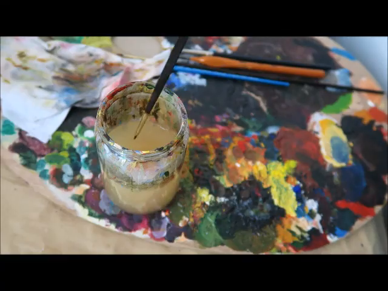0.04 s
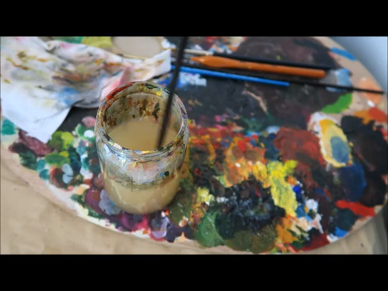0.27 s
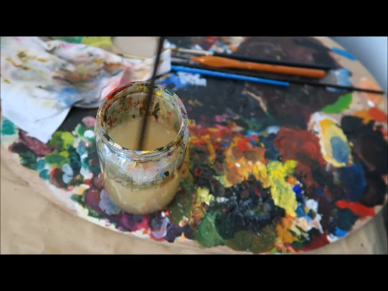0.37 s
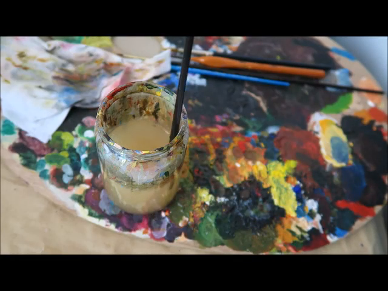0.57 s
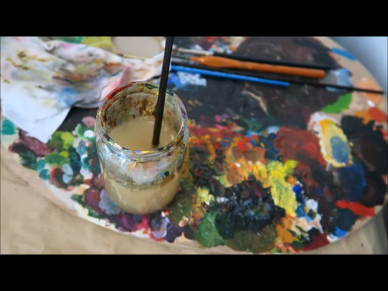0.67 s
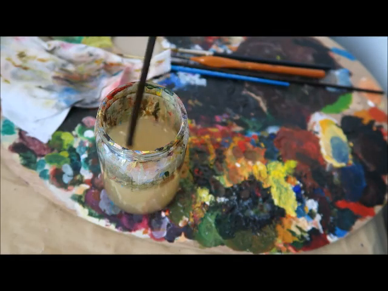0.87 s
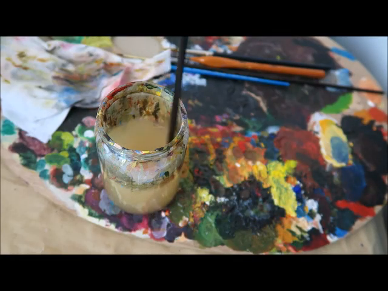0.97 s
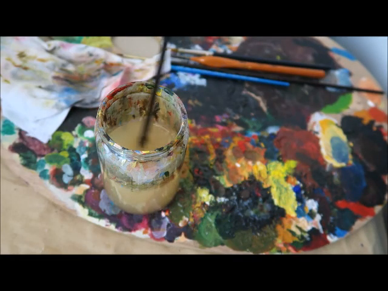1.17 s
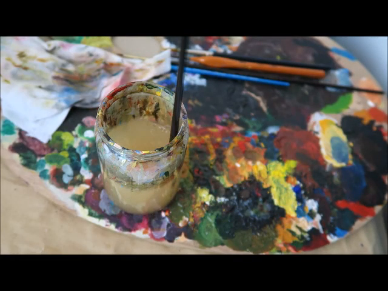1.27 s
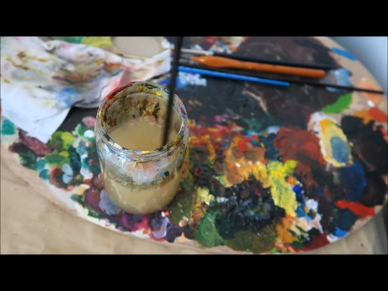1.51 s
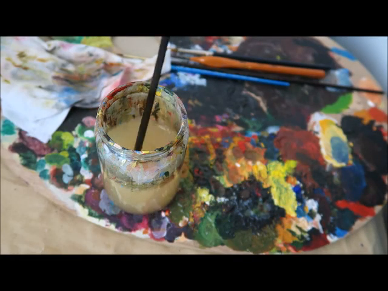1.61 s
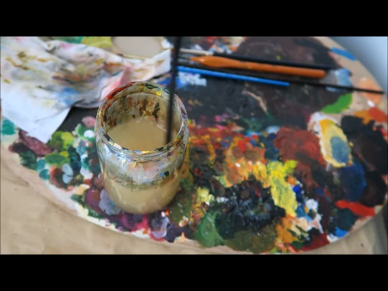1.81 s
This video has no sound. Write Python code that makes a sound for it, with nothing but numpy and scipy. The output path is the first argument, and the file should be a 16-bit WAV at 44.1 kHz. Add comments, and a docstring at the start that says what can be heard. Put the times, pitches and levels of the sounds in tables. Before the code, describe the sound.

A paintbrush clinks quickly against a glass jar while swishing in water, with small splashes.

```python
"""Paintbrush in a water jar

A brush is swished to and fro in a glass jar of water, close to the microphone, in a small room.
Its handle clicks against the glass and rings it; the bristles drag in bubbles and throw up small
splashes. One firm push rocks the jar on the palette beneath it. A low hum lies under it all."""
import sys
import numpy as np
from scipy import signal
from scipy.fft import rfft, irfft, next_fast_len
from scipy.io import wavfile
from scipy.ndimage import map_coordinates

SR = 44100
rng = np.random.default_rng(int(sys.argv[2]) if len(sys.argv) > 2 else 0)


def to_wav(sig):
    """Store sig (one row per channel, or 1-D mono) as 16-bit WAV at the path in sys.argv[1].

    Samples outside -1..1 are clipped; the rate is SR.
    """
    pcm = np.clip(np.atleast_2d(sig), -1, 1) * 32767
    pcm = np.round(pcm).astype(np.int16)
    wavfile.write(sys.argv[1], SR, pcm.T)  # frames by channels


N = 81585

# The low hum. Each row: frequency in Hz, rms level in dB.
HUM_TONES = [(48.4, -54), (75.2, -48), (123.8, -60.5), (204.6, -60)]
# Room tone. Each row: frequency in Hz, relative noise density in dB.
AIR_COLOUR = [(25, -16), (80, -8), (212, -10), (335, -14), (500, -21.5), (3500, -36), (16000, -51.5)]
# Room tone across the stereo pair. Each row: frequency in Hz, left-right correlation.
AIR_CORRELATION = [(60, 0.95), (130, 0.82), (250, 0.033), (4000, 0.079)]
# The room's decay. Each row: frequency in Hz, time to fall 60 dB (t60) in seconds.
REVERB_T60 = [(1300, 0.32), (9000, 0.39), (16000, 0.13)]
# The reverb's colour. Each row: frequency in Hz, relative level in dB.
REVERB_COLOUR = [(1200, 5), (3000, 5.5), (8000, -4.5), (16000, 0.5)]
# The reverb's width. Each row: frequency in Hz, added side gain in dB.
REVERB_WIDTH = [(1000, -10.5), (3000, -12.5), (8000, 6)]
# The palette under the jar. Each row: frequency in Hz, level in dB, t60 in seconds.
PALETTE_MODES = [(82.5, -19, 0.083), (221, -26, 0.13), (345, -26, 0.049)]
# Splashes behind the bristles. Each row: crest time and width in seconds, level in dB, pitch in Hz.
SPLASH_CRESTS = [(0.311, 0.0016, -46, 2110), (0.381, 0.0065, -49.5, 3010), (0.579, 0.016, -41, 2770),
                 (0.943, 0.031, -50, 2090), (1.019, 0.0055, -43, 2330), (1.188, 0.0058, -40, 3220),
                 (1.272, 0.01, -48, 3600), (1.35, 0.033, -42.5, 2350), (1.5256, 0.0032, -36, 2630),
                 (1.746, 0.0066, -39.5, 3080)]
# Bubbles. Each row: start in seconds, starting pitch in Hz, peak in dB, swell and t60 in seconds.
BRUSH_BUBBLES = [(0.4146, 1100, -26, 0.00019, 0.0068), (0.5660, 1790, -25.5, 0.00062, 0.0081),
                 (0.564, 4170, -28.5, 0.0018, 0.048), (0.566, 3770, -29, 0.0015, 0.064),
                 (0.5748, 1804, -27, 0.00075, 0.016), (0.5909, 4350, -8.5, 0.00081, 0.014),
                 (0.598, 4110, -17, 0.0014, 0.014), (0.617, 1053, -29, 0.0024, 0.0086),
                 (0.617, 4100, -28, 0.0012, 0.015), (1.018, 1660, -35, 0.00057, 0.0071),
                 (1.0292, 3015, -27.5, 0.00076, 0.063), (1.027, 1810, -22, 0.00078, 0.023),
                 (1.026, 1298, -22, 0.0017, 0.0084), (1.181, 4150, -34, 0.0007, 0.047),
                 (1.2020, 2703, -19, 0.0021, 0.014), (1.2884, 1190, -28, 0.0016, 0.01),
                 (1.3064, 1050, -20.5, 0.0089, 0.025), (1.321, 1420, -32.5, 0.002, 0.025),
                 (1.306, 2540, -34.5, 0.0016, 0.021), (1.343, 1410, -28.5, 0.0015, 0.032),
                 (1.345, 2820, -30.5, 0.0019, 0.017), (1.35, 3190, -35, 0.0018, 0.022),
                 (1.37, 1055, -28, .002, 0.027), (1.3744, 1201, -13, 0.0041, 0.011),
                 (1.5051, 1533, -37.5, 0.0015, 0.02), (1.5237, 2146, -35, 0.00049, 0.038),
                 (1.554, 1766, -27.5, 0.001, 0.028), (1.7390, 2970, -24, 0.00027, 0.0079),
                 (1.746, 2144, -32.5, 0.0003, 0.042), (1.746, 1170, -36.5, 0.00082, 0.016)]
# The jar's modes, lowest first. Each row: frequency in Hz, relative level in dB, t60 in seconds.
GLASS_MODES = [(2706, -0.5, 0.31), (3864, -13, 0.19), (4740, -2, 0.17), (4833, -1, 0.4), (5800, -8.5, 0.22),
               (6035, 1, 0.15), (7670, -1, 0.3), (9200, 0.5, 0.19), (11400, 6, 0.17)]
# Brief dips in the ring. Each row: centre in seconds, gain in dB, width in seconds.
GLASS_DIPS = [(0.416, -15, 0.0083), (0.8692, -42, 0.003), (0.907, -0.5, 0.0034)]
# The handle's click and its chatter. Each row: frequency in Hz, relative level in dB.
CLICK_COLOUR = [(200, -22.5), (700, -13), (1500, -7), (3000, -7.5), (6000, 8), (10000, 4.5), (14000, 6),
                (17000, -11.5)]
CHATTER_COLOUR = [(200, -20), (700, -2), (1500, -3), (3000, 11), (6000, 7), (10000, 7), (14000, 5),
                  (17000, -74.5)]
# Handle on glass. Each row: start in seconds, click and chatter levels in dB, chatter tilt in dB per
# octave, then ring gains in dB for the lowest two modes, the 4.8 kHz pair, the 6 kHz pair and the rest.
HANDLE_STRIKES = [(0.234, -11.5, -44.5, -33, -50, -41, -44, -51.5),
                  (0.4153, -2, -28, -1.5, -42, -39, -25, -39), (0.5082, -3.5, -29, 9, -45, -40.5, -37, -52),
                  (0.5912, -6, -19.5, 3.5, -40.5, -37, -35.5, -40),
                  (0.6661, -3, -23.5, 4, -49, -41.5, -45, -47),
                  (0.8568, -15.5, -20, -3, -17.5, -41.5, -32.5, -43),
                  (1.0267, -2, -19.5, -2.5, -28, -41.5, -36, -47),
                  (1.2011, -4.5, -23.5, -1.5, -35.5, -40.5, -35, -48),
                  (1.3076, -21, -38.5, 4, -50, -59, -53, -55), (1.3737, -4.5, -27, 5, -54, -43, -41, -46),
                  (1.553, -7, -33, 0.5, -43.5, -53.5, -50, -67)]

AIR_DB, HUM_WAVER_DB = -49.5, 1.5
KNOCK_SEND_DB, RING_SEND_DB, WATER_SEND_DB, REVERB_RISE_S = -8, -13, -10.5, 0.003
THUD_START_S, THUD_RISE_S = 0.858, 0.016
DROPLETS_PER_S, DROPLET_LOG_SPREAD, DROPLET_T60_CYCLES = 1100, 0.804, 30
STIR_START_S, STIR_HZ, STIR_DB = 0.31, 2333, -63
BUBBLE_RISE_PER_S = 5.5  # climb relative to the starting pitch
SHIMMER_HZ, SHIMMER_DB, SHIMMER_SPREAD_DB, SHIMMER_T60_S = (3200, 13500), -10, 4, 0.17  # weak high modes
RING_ATTACK_S, MODE_SPREAD_DB, FLUTTER_DB, FLUTTER_HZ = 0.00089, 1.5, 3.5, 19
SLOSH_DEPTH, SLOSH_HZ = 0.0045, 7.23  # moving water bends the pitch of the glass
CHATTER_T60_S, CHATTER_SIDE_DB, TILT_FROM_HZ = 0.031, -9.5, 2300
NEAR_ECHO_S, NEAR_ECHO_DB = 0.0025, -12.5  # each click comes back from a surface close by


def amp(db):
    """Decibels to gain."""
    return 10 ** (np.asarray(db) / 20)


def unit(x):
    """Scale to rms 1."""
    return x / np.sqrt(np.mean(x ** 2) + 1e-20)


def along(points, hz):
    """Read a curve of (Hz, value) points on a log frequency axis."""
    freqs, values = np.transpose(points)
    return np.interp(np.log(hz + 1), np.log(freqs + 1), values)


def fade(t, t60):
    """A decay of 60 dB in t60."""
    return amp(-60 * t / t60)


def wobble(rate):
    """A smooth random curve, rate knots a second."""
    return map_coordinates(rng.standard_normal(256), [np.arange(N) * rate / SR], mode="wrap")


def filtered(x, response):
    """Filter x by a gain given as a function of Hz."""
    n = x.shape[-1]
    size = next_fast_len(2 * n)
    return irfft(rfft(x, size) * response(np.fft.rfftfreq(size, 1 / SR)), size)[..., :n]


def add(track, start_s, sound):
    """Mix a sound into the track."""
    i = int(np.clip(round(start_s * SR), 0, N))
    track[..., i:i + sound.shape[-1]] += sound[..., :N - i]


def background():
    """A wavering hum over quiet room tone, centred in the bass and wide above it."""
    t = np.arange(N) / SR
    hum = np.zeros(N)
    for hz, db in HUM_TONES:
        peak = np.sqrt(2) * amp(db + HUM_WAVER_DB * wobble(6.36))
        hum += peak * np.sin(2 * np.pi * hz * t + 1.11 * wobble(5.72))
    angle = lambda f: np.arccos(np.clip(along(AIR_CORRELATION, f), -1, 1)) / 2
    mid_side_gains = lambda f: amp(along(AIR_COLOUR, f)) * [np.cos(angle(f)), np.sin(angle(f))]
    mid, side = filtered(rng.standard_normal((2, N)), mid_side_gains)
    return hum + amp(AIR_DB) * unit(np.array([mid + side, mid - side]))


def room(x, side_db):
    """The small room's reflections, in stereo; the highest treble dies first."""
    hz, t, noise = signal.stft(rng.standard_normal((2, SR // 2)), SR, nperseg=256)
    decay = fade(t, along(REVERB_T60, hz)[:, None])
    _, tail = signal.istft(noise * decay * amp(along(REVERB_COLOUR, hz))[:, None], SR)
    tail *= 1 - np.exp(-(np.arange(tail.shape[1]) / SR / REVERB_RISE_S) ** 2)
    mid, side = signal.fftconvolve(x[None], tail / np.linalg.norm(tail[0]), axes=1)[:, :N]
    side = filtered(side, lambda f: amp(side_db + along(REVERB_WIDTH, f)))
    return np.array([mid + side, mid - side])


def thud():
    """One firm push rocks the jar and sounds the palette's low modes."""
    out, t = np.zeros(N), np.arange(SR // 2) / SR
    modes = sum(amp(db) * fade(t, t60) * np.sin(2 * np.pi * hz * t) for hz, db, t60 in PALETTE_MODES)
    add(out, THUD_START_S, modes * (1 - np.exp(-(t / THUD_RISE_S) ** 2)))
    return out


def droplets(centre_hz):
    """An even patter of tiny bubbles around one pitch, rms 1."""
    when, pitch, strength = rng.random((int(DROPLETS_PER_S * N / SR), 3)).T[:, :, None]
    age = np.arange(SR // 80)  # samples
    cycles = centre_hz * np.exp(DROPLET_LOG_SPREAD * (2 * pitch - 1)) * age / SR
    grains = amp(10 * strength) * np.sin(2 * np.pi * cycles) * fade(cycles, DROPLET_T60_CYCLES)
    positions = (when * N).astype(int) + age
    return unit(np.bincount(positions.ravel(), grains.ravel(), N)[:N])


def splashes():
    """Droplets, faint while the brush stirs and stronger in each splash."""
    t = np.arange(N) / SR
    crests = sum(amp(db) * np.exp(-0.5 * ((t - crest) / width) ** 2) * droplets(hz)
                 for crest, width, db, hz in SPLASH_CRESTS)
    return crests + amp(STIR_DB) * (t > STIR_START_S) * droplets(STIR_HZ)


def bubbles():
    """Each bubble dragged in by the bristles swells, rings and climbs in pitch."""
    out, t = np.zeros(N), np.arange(SR // 8) / SR
    for start, hz, db, swell, t60 in BRUSH_BUBBLES:
        envelope = (1 - np.exp(-(t / swell) ** 2)) * fade(t, t60)
        chirp = np.sin(2 * np.pi * hz * (t + BUBBLE_RISE_PER_S * t * t / 2))
        add(out, start, amp(db) * envelope / envelope.max() * chirp)
    return out


def glass_ring(t, ring_db):
    """The jar rings after a blow; the spot struck decides which modes speak."""
    shimmer = [(hz, SHIMMER_DB + SHIMMER_SPREAD_DB * rng.standard_normal(), SHIMMER_T60_S)
               for hz in rng.uniform(*SHIMMER_HZ, size=30)]
    hz, mode_db, t60 = np.transpose(GLASS_MODES + shimmer)[:, :, None]
    struck_db = np.take(ring_db, np.arange(len(hz)) // 2, mode="clip")[:, None]
    gains = amp(struck_db + mode_db + MODE_SPREAD_DB * rng.standard_normal(hz.shape))
    bend = 1 + SLOSH_DEPTH * np.sin(2 * np.pi * (SLOSH_HZ * t + rng.random(hz.shape)))
    beat_hz = FLUTTER_HZ * rng.uniform(0.5, 2.02, hz.shape)  # each mode beats at its own rate
    flutter = amp(FLUTTER_DB * np.sin(2 * np.pi * (beat_hz * t + rng.random(hz.shape))))
    cycles = np.cumsum(hz * bend, axis=1) / SR + rng.random(hz.shape)
    modes = gains * flutter * fade(t, t60) * np.sin(2 * np.pi * cycles)
    return modes.sum(0) * (1 - np.exp(-t / RING_ATTACK_S))


def handle_chatter(t, tilt_db):
    """The handle chatters on the glass: a short burst of noise, as mid and side."""
    octaves = lambda f: np.log2(np.maximum(f, TILT_FROM_HZ) / TILT_FROM_HZ)
    colour = lambda f: amp(along(CHATTER_COLOUR, f) + tilt_db * octaves(f))
    return unit(filtered(rng.standard_normal((2, len(t))), colour)) * fade(t, CHATTER_T60_S)


def handle_click(size=1024):
    """The hard contact of handle and glass: a sharp pulse of peak 1."""
    cepstrum = irfft(np.log(amp(along(CLICK_COLOUR, np.fft.rfftfreq(size, 1 / SR)))))
    cepstrum[1:size // 2] *= 2  # fold to minimum phase, so nothing sounds ahead of the blow
    cepstrum[size // 2 + 1:] = 0
    pulse = irfft(np.exp(rfft(cepstrum)))
    return pulse / np.abs(pulse).max()


def clinks():
    """Each blow of the handle clicks, chatters and rings the glass."""
    clicks, chatters, rings = np.zeros(N), np.zeros((2, N)), np.zeros(N)
    click, t = handle_click(), np.arange(SR // 2) / SR
    for start, click_db, chatter_db, tilt_db, *ring_db in HANDLE_STRIKES:
        add(clicks, start, amp(click_db) * click)
        add(clicks, start + NEAR_ECHO_S, amp(click_db + NEAR_ECHO_DB) * click)
        add(chatters, start, amp(chatter_db) * handle_chatter(t, tilt_db))
        add(rings, start, glass_ring(t, ring_db))
    dips_db = sum(db * np.exp(-0.5 * ((np.arange(N) / SR - centre) / width) ** 2)
                  for centre, db, width in GLASS_DIPS)
    return clicks, chatters, rings * amp(dips_db)


def scene():
    """The jar stands close, straight ahead of the microphone; the room spreads around it."""
    clicks, (chatter_mid, chatter_side), rings = clinks()
    knocks = clicks + chatter_mid
    width = amp(CHATTER_SIDE_DB) * np.array([chatter_side, -chatter_side])
    water = bubbles() + splashes()
    reverb = room(amp(KNOCK_SEND_DB) * knocks + amp(RING_SEND_DB) * rings, side_db=-4.5)
    reverb += room(amp(WATER_SEND_DB) * water, side_db=-3.5)
    return background() + reverb + thud() + water + rings + knocks + width


def record(dry, top_hz=16900):
    """The microphone's signal is cut steeply above the band limit."""
    return filtered(dry, lambda hz: 1 / (1 + (hz / top_hz) ** 80))


dry = scene()
out = record(dry)
to_wav(out)
```